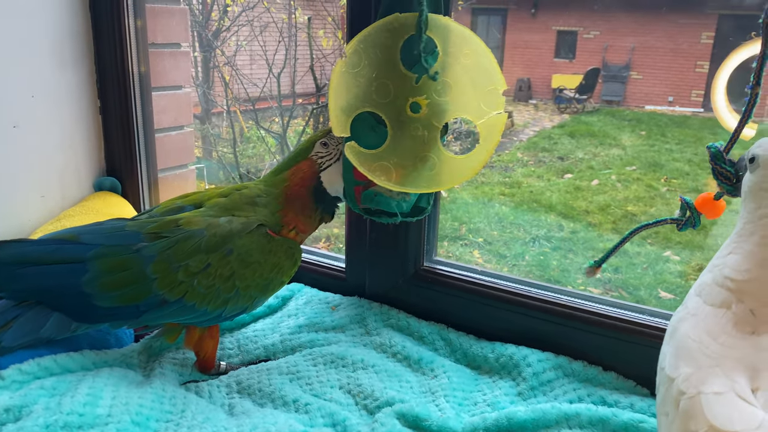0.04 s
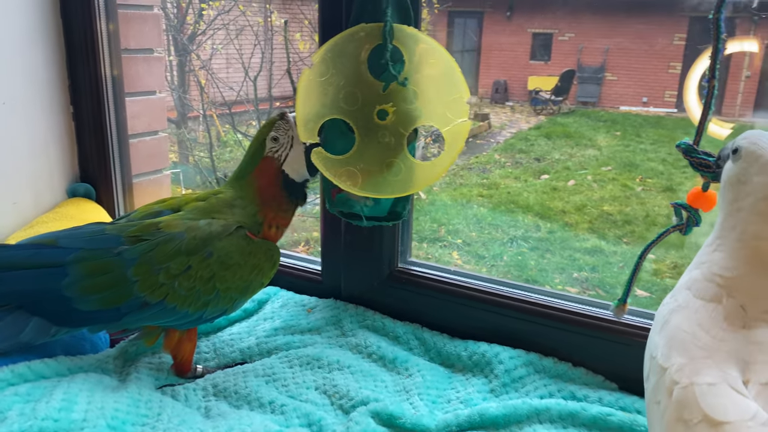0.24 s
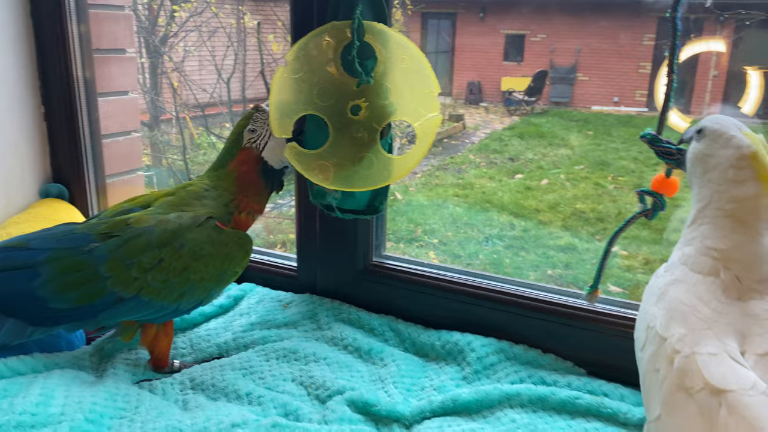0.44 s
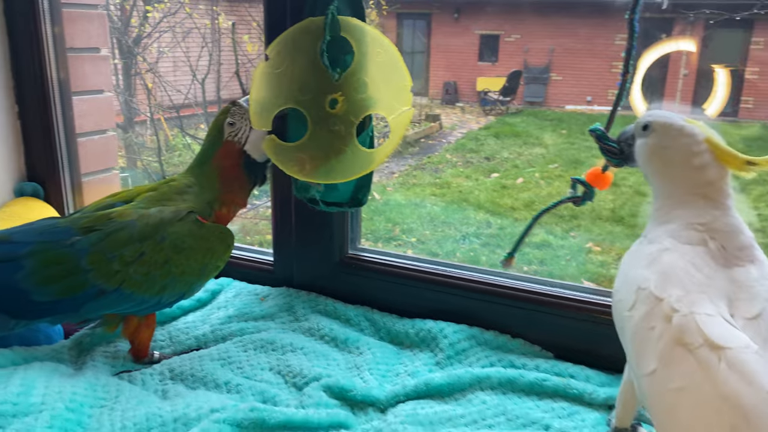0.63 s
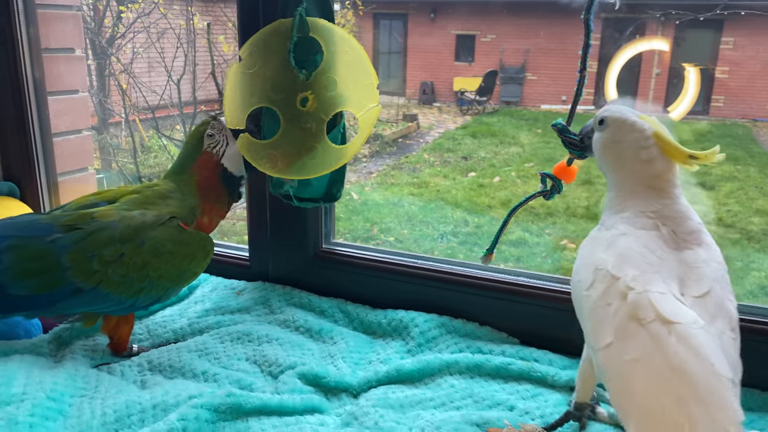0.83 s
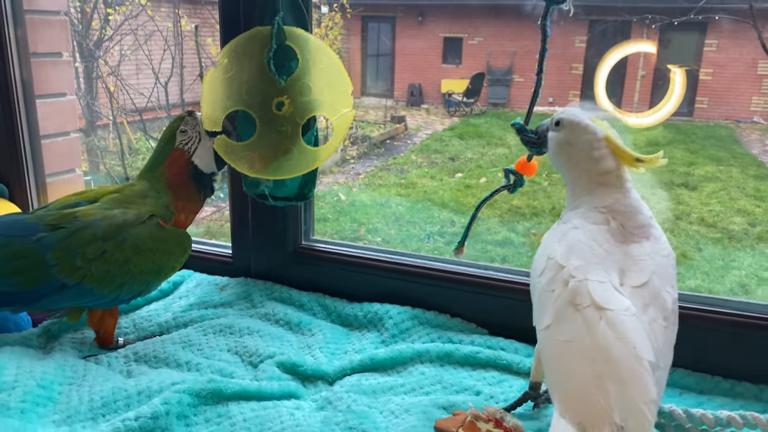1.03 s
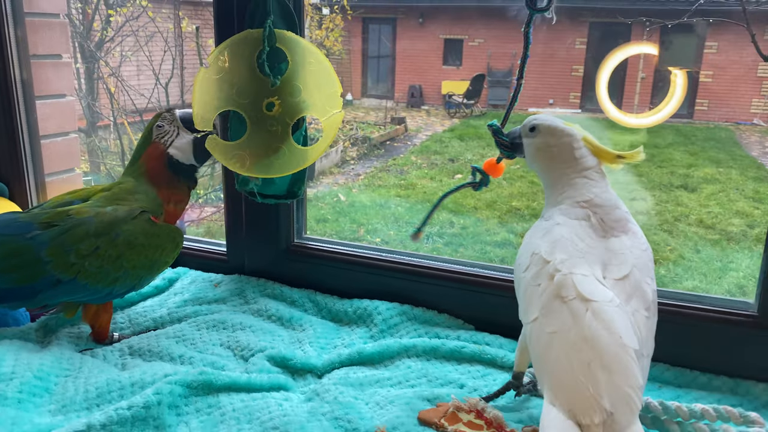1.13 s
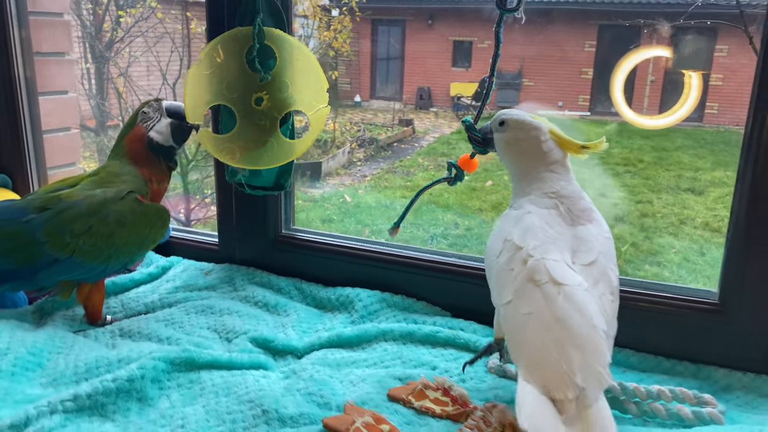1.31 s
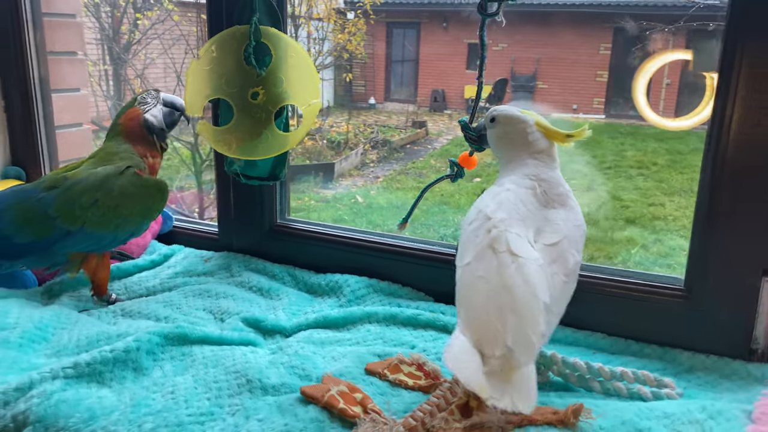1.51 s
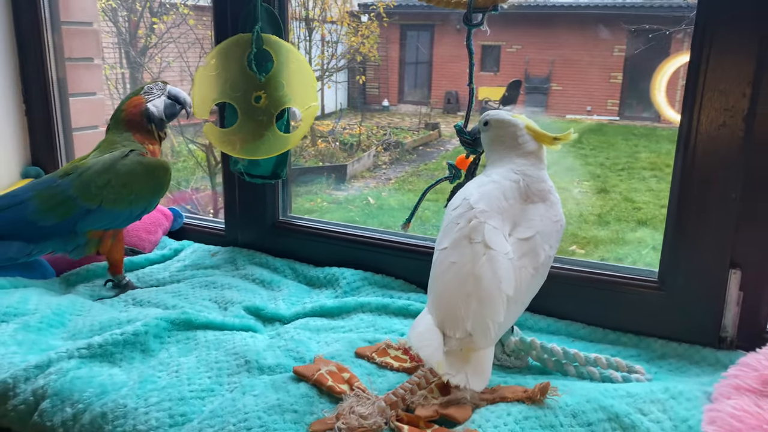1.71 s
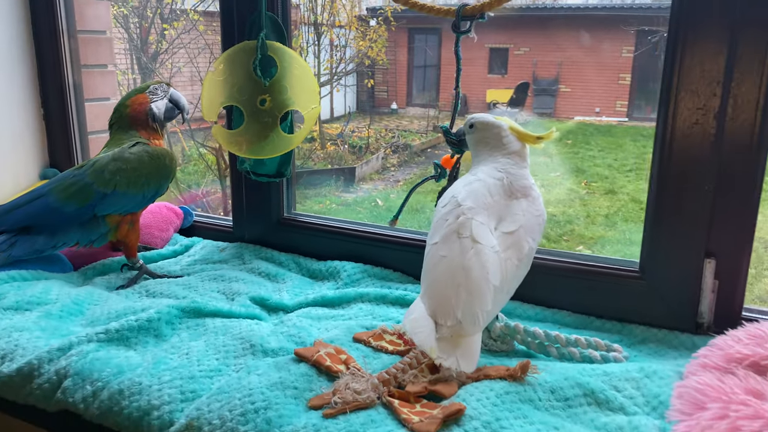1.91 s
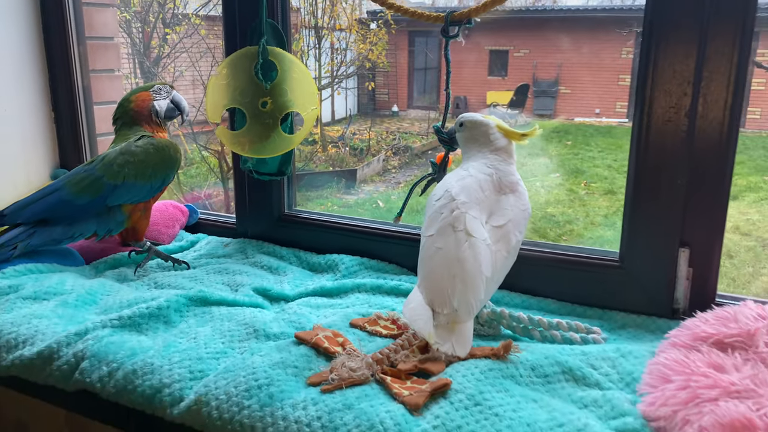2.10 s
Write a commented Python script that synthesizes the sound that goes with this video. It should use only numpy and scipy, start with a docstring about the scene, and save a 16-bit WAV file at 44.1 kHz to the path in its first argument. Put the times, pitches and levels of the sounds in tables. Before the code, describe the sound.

A parrot gives a short, hoarse, falling squeak at about 0.2 seconds, which breaks straight into one harsh, rasping hiss. The hiss peaks around 0.55 seconds and dies by 0.8, with a short room echo. Faint feather and blanket rustles follow, with soft bumps, a cluster of knocks from 1.5 to 1.7 seconds and another near 2.1. Low microphone handling rumble runs quietly underneath.

```python
"""A parrot's hoarse squeak breaks into one harsh, rasping hiss that swells until it breaks off.
The syrinx chops its breath, throat and beak resonate, the window and walls of a live room answer.
Birds shift on a blanket: feathers and cloth rustle, and soft bumps sound through the window seat.
The hand-held microphone rumbles as it backs away."""
import sys
import numpy as np
from scipy import signal
from scipy.fft import rfft, irfft, next_fast_len
from scipy.io import wavfile
from scipy.ndimage import map_coordinates

SR = 44100
rng = np.random.default_rng(int(sys.argv[2]) if len(sys.argv) > 2 else 0)


def transcribe(signal):
    """Save signal, clipped to [-1, 1], as a 16-bit WAV file at the path in sys.argv[1]."""
    frames = np.atleast_2d(signal).T
    limited = np.clip(frames, -1, 1)
    pcm = np.round(limited * 32767).astype(np.int16)
    wavfile.write(sys.argv[1], SR, pcm)


N = 94815


def amp(db):
    """Decibels to gain."""
    return np.exp(np.asarray(db) * (np.log(10) / 20))


def unit(x):
    """Scale to rms 1."""
    return x / np.sqrt(np.mean(x ** 2) + 1e-20)


def along(points, hz):
    """Interpolate (f/Hz, value) points on a log axis."""
    f, v = np.transpose(points)
    return np.interp(np.log(hz + 1), np.log(f + 1), v)


def curves(rows):
    """One value per sample for each column after the time."""
    times, *columns = np.transpose(rows)
    return [np.interp(np.arange(N) / SR, times, column) for column in columns]


def wobble(rate_hz):
    """Smooth random curve, rate_hz knots a second."""
    coarse = np.arange(0, N + 8, 8)
    knots = rng.standard_normal(N // 20)
    return np.interp(np.arange(N), coarse, map_coordinates(knots, [coarse * rate_hz / SR], mode="wrap"))


def filtered(x, response):
    """Apply a frequency response."""
    n = x.shape[-1]
    size = next_fast_len(n + 4096, real=True)
    return irfft(rfft(x, size) * response(np.fft.rfftfreq(size, 1 / SR)), size)[..., :n]


def coloured(x, spectrum):
    """Shape x by (f/Hz, level/dB) points; rms 1."""
    return unit(filtered(x, lambda hz: amp(along(spectrum, hz))))


def pan(balance_db):
    """Stereo gains, left minus right = balance_db."""
    return amp(balance_db * np.array([[.5], [-.5]]))


def left_first(x, lead_s=.00043):
    """Sound from the left reaches the left microphone port first."""
    return filtered(x, lambda hz: np.exp(1j * np.pi * hz * lead_s * np.array([[1], [-1]])))


# likeness of the two ports: f/Hz, correlation
PORT_COHERENCE = [(50, 0.94), (130, .78), (260, 0.87), (500, 0.24), (1000, -0.39), (1500, -0.041),
                  (2500, -0.00062), (4500, -0.012), (6000, 0.12), (12000, 0.28)]
def diffuse(spectrum=((1, 0), (20000, 0)), size=N):
    """Noise from all sides at two spaced ports: alike in the bass only."""
    def mid_side_gains(hz):
        angle = np.arccos(np.clip(along(PORT_COHERENCE, hz), -1, 1)) / 2
        return amp(along(spectrum, hz)) * [np.cos(angle), np.sin(angle)]
    mid, side = filtered(rng.standard_normal((2, size)), mid_side_gains)
    return unit(np.array([mid + side, mid - side]))


def hoarse_tone(pitch_hz, partials, jitter, flutter_db):
    """Tone whose pitch and level shake from cycle to cycle; rms 1."""
    phase = 2 * np.pi * np.cumsum(pitch_hz * (1 + jitter * wobble(700))) / SR
    flutter = amp(flutter_db * wobble(200))
    tone = sum(amp(db) * np.sin(k * phase + rng.uniform(0, 2 * np.pi)) for k, db in partials)
    return unit(flutter * tone)


# squeak contour: t/s, f/Hz, level/dB
SQUEAK_GLIDE = [(.1, 932, -110), (.135, 930.6, -62), (.165, 929.8, -47.5), (.195, 921.6, -43.5),
                (.225, 914, -46.5), (.255, 900, -48), (.29, 757, -48), (.32, 700, -120)]
# squeak timbre: harmonic, level/dB
SQUEAK_HARMONICS = [(1, 1.5), (2, -0.5), (3, -4.5), (4, 3), (5, -10), (6, -8), (7, -6.5), (8, -21.5)]
def squeak():
    """The hoarse, falling tone that opens the hiss."""
    pitch_hz, level_db = curves(SQUEAK_GLIDE)
    return amp(level_db) * hoarse_tone(pitch_hz, SQUEAK_HARMONICS, jitter=.018, flutter_db=2.5)


def rasp(flap_hz=165.17, scatter=.3, spread_db=4, pulse_s=.0033, depth=.62):
    """Turbulent air, chopped by the uneven flapping of the syrinx."""
    rate_hz = flap_hz * np.exp(scatter * wobble(120))
    onsets = np.diff(np.floor(np.cumsum(rate_hz) / SR), prepend=0)
    flaps = onsets * amp(spread_db * rng.standard_normal(N))
    gate = unit(signal.lfilter([1], [1, -np.exp(-1 / (pulse_s * SR))], flaps))
    return unit(rng.standard_normal(N) * (1 - depth + depth * gate))


def resonance(flow, centre_hz, width_hz):
    """Moving, steep-skirted resonance stirred by the flow; rms 1."""
    drive = flow * rng.choice([-1, 1], N)  # same pulses, uncorrelated noise
    carrier = np.exp(2j * np.pi * np.cumsum(centre_hz) / SR)
    pole = np.exp(-np.pi * width_hz / SR)
    return unit((signal.lfilter([1], np.poly([pole, pole]), drive / carrier) * carrier).real)


# main throat resonance: t/s, f/Hz, level/dB, whistle level/dB
THROAT_FORMANT = [(.17, 2378, -9, -13.5), (.24, 2388, -7, 2), (.29, 2267, 1, -15.5), (.34, 2104, -1.5, -8),
                  (.43, 2380, -2, -6.5), (.49, 2475, -2.5, -5.5), (.56, 2450, -5, -7.5),
                  (.608, 2080, 1, -14), (.75, 2214, 3, -6.5)]
# beak cavity: t/s, f/Hz, level/dB
BEAK_FORMANT = [(.15, 930, -2), (.2, 1090, -0.5), (.22, 1095, -10), (.26, 1040, -8.5), (.295, 700, -10),
                (.38, 953, -17.5), (.47, 1020, -18.5), (.54, 740, -16), (.61, 1120, -17),
                (.69, 1440, -12.5)]
# breath noise: f/Hz, level/dB
BREATH_SPECTRUM = [(300, -51.5), (540, -35), (660, -13), (1000, -9), (1350, -3.5), (1650, .5), (2700, -1),
                   (3100, -0.5), (4000, 0), (5050, 1), (5600, -8.5), (6600, -2.5), (7400, -10),
                   (8600, -27.5), (10300, -16), (12300, -22), (13000, -51)]
# whistle timbre: harmonic (2 = main resonance), level/dB
WHISTLE_HARMONICS = [(1, -14), (2, 3), (3, -11)]
# upper throat resonance: ratio to main, width/Hz, level/dB
UPPER_FORMANT = [(1.729, 455.6, -10.5)]
def throat_and_beak(flow):
    """Throat and beak colour the flow; a thin whistle rides the main resonance."""
    throat_hz, throat_db, whistle_db = curves(THROAT_FORMANT)
    beak_hz, beak_db = curves(BEAK_FORMANT)
    throat_hz *= 1 + .00927 * wobble(59.9)
    voice = amp(-1) * coloured(flow, BREATH_SPECTRUM)
    voice += amp(throat_db) * resonance(flow, throat_hz, width_hz=730)
    voice += amp(whistle_db) * hoarse_tone(throat_hz / 2, WHISTLE_HARMONICS, jitter=.04, flutter_db=3)
    voice += amp(beak_db) * resonance(flow, beak_hz, width_hz=312)
    for ratio, width_hz, db in UPPER_FORMANT:
        voice += amp(db) * resonance(flow, ratio * throat_hz, width_hz)
    return voice


# breath effort: t/s, level/dB
BREATH_EFFORT = [(.1, -87), (.15, -48.5), (.18, -40.5), (.205, -47), (.215, -31), (.24, -26), (.33, -24),
                 (.42, -25.5), (.48, -22), (.53, -18.5), (.57, -19), (.608, -20.5), (.622, -30.5),
                 (.7, -30), (.76, -35.5), (.8, -49), (.85, -84.5)]
# sudden pushes of air: t/s, boost/dB
AIR_PUSHES = [(0.212, 7), (0.46, 4), (.5, 3), (.533, 4), (0.604, 4), (0.612, 7)]
def hiss(push_s=.0031, low_cut_hz=567, treble_hz=5500, fade_from_s=.57, fade_db_per_s=40.5):
    """A squeak breaks into a swelling rasp; the treble fades as the breath runs out."""
    t = np.arange(N) / SR
    effort_db, = curves(BREATH_EFFORT)
    effort_db += sum(db * np.exp(-((t - at_s) / push_s) ** 2) for at_s, db in AIR_PUSHES)
    call = throat_and_beak(rasp()) * amp(effort_db - 6) + squeak()
    call = filtered(call, lambda hz: 1 - 1 / (1 + (hz / low_cut_hz) ** 20))
    treble = filtered(call, lambda hz: 1 - 1 / (1 + (hz / treble_hz) ** 10))
    fade = amp(-fade_db_per_s * np.maximum(t - fade_from_s, 0))
    return call + treble * (fade - 1)


def walls(x, count=20, first_s=.002, last_s=.02, port_gap_s=.00046):
    """Early echoes off the window and walls, each from its own side."""
    echoes = np.zeros((2, SR // 10))
    for when, side in rng.uniform(0, 1, (count, 2)):
        delay_s = first_s + when * (last_s - first_s) + port_gap_s * (side - .5) * np.array([1, -1])
        echoes[[0, 1], np.round(delay_s * SR).astype(int)] += 1 / np.sqrt(count)
    return signal.fftconvolve(x[None], echoes, axes=1)[:, :N]


# reverberation: f/Hz, T60/s
ROOM_T60 = [(100, 0.55), (260, 1), (600, 0.66), (1000, 0.8), (2200, 0.79), (4500, 0.7), (7000, 0.52),
            (12000, 0.43)]
def room(x, build_s=.0073):
    """The room's tail; each frequency dies at its own speed."""
    hz, t, bins = signal.stft(diffuse(size=SR), SR, nperseg=256)
    envelope = amp(-60 * t / along(ROOM_T60, hz)[:, None]) * (1 - np.exp(-t / build_s))
    _, tail = signal.istft(bins * envelope, SR, nperseg=256)
    return signal.fftconvolve(x[None], tail / np.linalg.norm(tail[0]), axes=1)[:, :N]


# stereo balance of the call: f/Hz, left minus right/dB
CALL_BALANCE = [(500, -4), (1000, 0.5), (2300, -3.5), (3800, 0), (5200, 2), (6500, 0.5), (7500, -8),
                (8600, 0.5), (12000, -0.5)]
def across_room(call, walls_db=2.5, room_db=1.5):
    """The call arrives directly; walls and room follow."""
    heard = left_first(call) + amp(walls_db) * walls(call) + amp(room_db) * room(call)
    return filtered(heard, lambda hz: pan(along(CALL_BALANCE, hz)))


def contact(spectrum, t60_s, attack_s=.00068, length_s=.5):
    """One damped contact: a decaying noise burst."""
    t = np.arange(int(length_s * SR)) / SR
    burst = coloured(rng.standard_normal(len(t)), spectrum)
    return burst * (1 - np.exp(-t / attack_s)) * amp(-60 * t / t60_s)


# soft bumps: t/s, thud level/dB, click level/dB, room send/dB
SEAT_BUMPS = [(.106, -49, -80, 6.5), (.375, -40, -63.5, 2.5), (.835, -47.5, -72, 8), (.869, -48.5, -59, 2),
              (1.159, -56, -64, 0), (1.199, -55, -64, 4.5), (1.511, -43, -43.5, 6.5), (1.523, -55, -43, -6),
              (1.541, -43.5, -58.5, -6), (1.575, -47.5, -56, -13), (1.722, -47.5, -73, -6)]
# harder knocks: t/s, knock level/dB, claw tick level/dB, room send/dB
SEAT_KNOCKS = [(1.668, -34.5, -43, -1), (1.677, -37, -64, 0.5), (1.691, -42.5, -67, -3.5),
               (2.139, -43.5, -70, 4)]
# contact spectra: f/Hz, level/dB
THUD_SPECTRUM = [(40, -7.5), (100, -1.5), (180, -8.5), (260, 3.5), (350, -3), (500, -2.5), (750, -3),
                 (1100, -13.5), (2000, -12), (5000, -45)]
CLICK_SPECTRUM = [(200, -21), (900, -7.5), (2300, 7.5), (4500, -1.5), (8000, -12.5), (15000, -28.5)]
KNOCK_SPECTRUM = [(40, -16.5), (120, -11), (175, 4), (300, -7), (470, 4), (700, 3.5), (1000, -7),
                  (1300, -7), (1800, -15), (3000, -26), (10000, -42.5)]
CLAW_SPECTRUM = [(1500, -30), (3000, -12), (3750, 0), (4500, -12.5), (7000, -20), (14000, -35)]
def bumps():
    """Birds bump the seat and knock it with a tick of claws; the room answers."""
    hits = []
    for at_s, thud_db, click_db, room_db in SEAT_BUMPS:
        thud = amp(thud_db) * contact(THUD_SPECTRUM, t60_s=.079)
        click = amp(click_db) * contact(CLICK_SPECTRUM, t60_s=.043)
        hits.append((at_s, thud + click, room_db))
    for at_s, knock_db, tick_db, room_db in SEAT_KNOCKS:
        knock = amp(knock_db) * contact(KNOCK_SPECTRUM, t60_s=.054)
        tick = amp(tick_db) * contact(CLAW_SPECTRUM, t60_s=.025)
        hits.append((at_s, knock + tick, room_db))
    direct, send = np.zeros((2, N))
    for at_s, hit, room_db in hits:
        start = round(at_s * SR)
        hit = hit[:N - start]
        direct[start:start + len(hit)] += hit
        send[start:start + len(hit)] += amp(room_db) * hit
    return direct + room(send)


# feathers and cloth: t/s, level/dB
RUSTLE_LEVEL = [(0, -84), (.1, -68), (.8, -54.5), (1.02, -56.5), (1.1, -57.5), (1.17, -55), (1.27, -59.5),
                (1.38, -50.5), (1.48, -54), (1.65, -54.5), (1.76, -66.5), (1.84, -60), (1.93, -67),
                (2.01, -61.5), (2.15, -65.5)]
# sliding noise: f/Hz, level/dB
CLOTH_SPECTRUM = [(120, -33.5), (200, -9), (371, -2.5), (515, -9), (690, -0.5), (827, -9), (1210, -2),
                  (1510, -6), (4330, -7.5), (7900, -13), (11400, -12.5), (13400, -26), (15500, -17)]
def rustle(grain_db=2, flutter_db=1, direct_db=-7):
    """Feathers and blanket slide in many tiny catches."""
    level_db, = curves(RUSTLE_LEVEL)
    direct = left_first(coloured(rng.standard_normal(N), CLOTH_SPECTRUM))
    sliding = unit(diffuse(CLOTH_SPECTRUM) + amp(direct_db) * direct)
    catches_db = flutter_db * wobble(29.78) + grain_db * wobble(500)
    return sliding * amp(level_db + catches_db) * pan(balance_db=-1)


# microphone handling: t/s, level/dB
RUMBLE_LEVEL = [(0.0, -80), (0.09, -77), (0.12, -64.5), (0.28, -62.5), (0.36, -72), (0.42, -58),
                (0.56, -56), (0.63, -65), (0.97, -56.5), (1.0, -68), (1.03, -53.5), (1.1, -61.5),
                (1.16, -52), (1.3, -57.5), (1.31, -57), (1.67, -56), (1.87, -71.5), (2.13, -64)]
# handling noise: f/Hz, level/dB
RUMBLE_SPECTRUM = [(15, -49.5), (26, -24), (35, 0.5), (50, -2), (72, 2.5), (90, -6.5), (130, -12.5),
                   (250, -11.5), (450, -16), (900, -34.5), (3000, -70)]
def handling(lumps_db=2, gain_db=1):
    """Low, lumpy rumble of the moving microphone."""
    level_db, = curves(RUMBLE_LEVEL)
    rumble = diffuse(RUMBLE_SPECTRUM)
    return rumble * amp(gain_db + level_db + lumps_db * wobble(20)) * pan(balance_db=-3)


# room tone: f/Hz, level/dB
ROOM_TONE_SPECTRUM = [(15, -27.5), (65, -1.5), (110, -13.5), (240, -19), (450, -20), (2000, -24.5),
                      (12000, -34), (15000, -35.5)]
def room_tone(level_db=-76):
    """Faint, steady noise from all sides."""
    return amp(level_db) * diffuse(ROOM_TONE_SPECTRUM)


def scene():
    """Hiss, bumps and rustle over rumble and room tone."""
    return across_room(hiss()) + bumps() + rustle() + handling() + room_tone()


def record(dry, top_hz=15750):
    """Brick-wall low-pass."""
    return filtered(dry, lambda hz: hz < top_hz)


dry = scene()
out = record(dry)
transcribe(out)
```